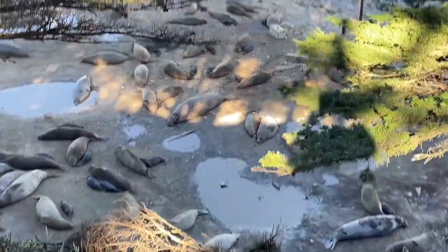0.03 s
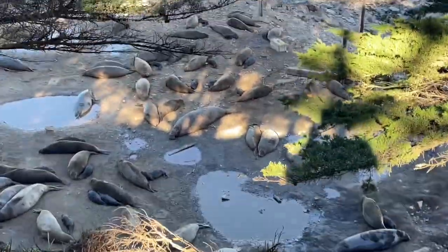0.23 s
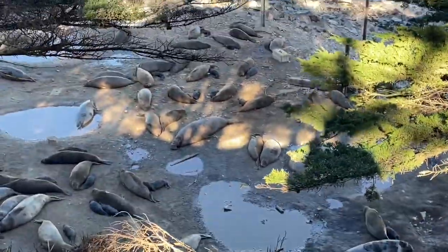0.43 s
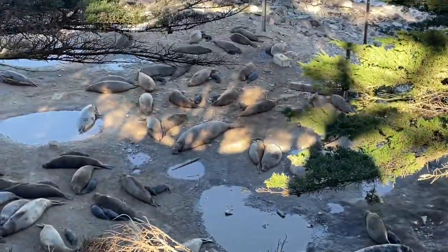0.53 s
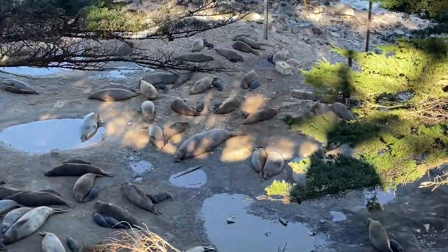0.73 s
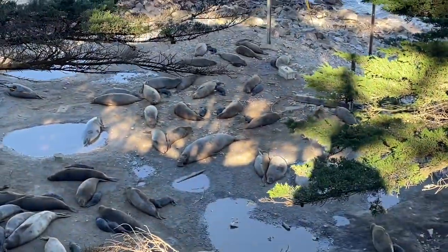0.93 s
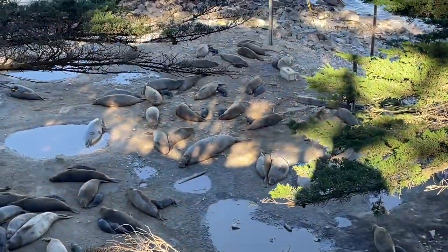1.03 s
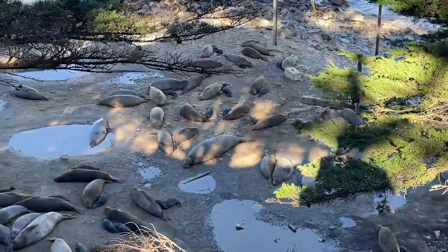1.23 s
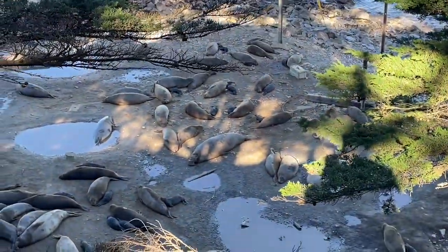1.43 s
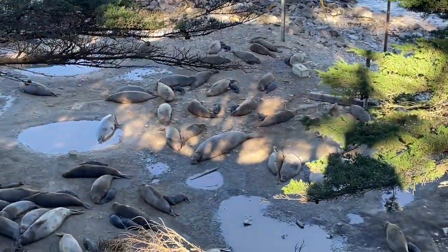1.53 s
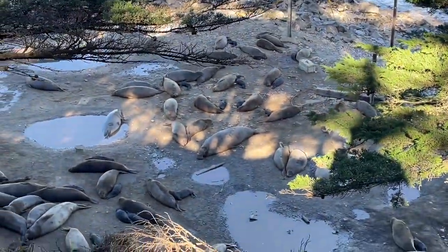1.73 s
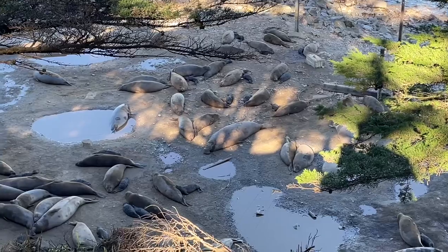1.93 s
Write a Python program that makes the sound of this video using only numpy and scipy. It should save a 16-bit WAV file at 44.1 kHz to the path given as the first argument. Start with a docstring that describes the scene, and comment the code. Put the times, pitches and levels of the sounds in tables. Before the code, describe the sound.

Young elephant seals give four high, wavering, raspy cries over faint surf.

```python
"""Faint surf and a thin rustle, then distant yelps and four high, wavering cries of young elephant seals
on a beach below the listener. Pulsing vocal folds ring the throat, and a second, slower oscillator there
makes each cry rasp. A slope, a bank and a cliff throw the voices back. Soft low bumps knock on the
hand-held microphone, and one small tick falls in the pause before the last cry."""
import sys
import numpy as np
from scipy import signal
from scipy.fft import rfft, irfft
from scipy.io import wavfile
from scipy.ndimage import uniform_filter1d

SR = 44100
rng = np.random.default_rng(int(sys.argv[2]) if len(sys.argv) > 2 else 0)


def dump_mix(stems):
    """Bounce the given channels to the path in sys.argv[1] as a 16-bit WAV at rate SR."""
    frames = np.atleast_2d(stems).T  # one column per channel
    limited = np.clip(frames, -1, 1)  # hard clip at full scale
    pcm = np.round(limited * 32767).astype(np.int16)
    wavfile.write(sys.argv[1], SR, pcm)


N = 88200
TIME = np.arange(N) / SR


def undb(db):
    """Decibels to gain."""
    return 10 ** (np.asarray(db) / 20)


def unit(x):
    """Scale to rms 1."""
    return x / np.sqrt(np.mean(x ** 2) + 1e-18)


def even(x):
    """Ride the slow level to rms 1 and keep the fast flutter."""
    return x / np.sqrt(uniform_filter1d(x ** 2, 1400) + 1e-12)


def curve(rows, column=1):
    """Automation: one column of a table, joined by straight lines in time."""
    rows = np.array(rows)
    return np.interp(TIME, rows[:, 0], rows[:, column])


def equalise(x, points):
    """Filter by an EQ curve of (frequency [Hz], gain [dB]) points."""
    hz, db = np.array(points).T
    bins_hz = np.maximum(np.fft.rfftfreq(2 * N, 1 / SR), 1)
    gain = undb(np.interp(np.log(bins_hz), np.log(hz), db))
    return irfft(rfft(x, 2 * N) * gain)[:N]


def lowpass(x, hz, order=2):
    """Low-pass without delay."""
    return signal.sosfiltfilt(signal.butter(order, hz, fs=SR, output="sos"), x, padtype="even")


def wobble(hz):
    """Smooth random modulation at rms 1, rolling off above hz."""
    rolloff = np.exp(-(np.fft.rfftfreq(N, 1 / SR) / hz) ** 2)
    return unit(irfft(rfft(rng.standard_normal(N)) * rolloff, N))


# Stereo width across the spectrum (frequency [Hz], side gain [dB])
WIDTH_EQ = [(50,-12.5),(900,-6),(2200,-8),(4000,-69),(7000,2.5)]

def spread(mid, side):
    """Mid and equalised side to left and right."""
    return mid + np.array([[1], [-1]]) * equalise(side, WIDTH_EQ)


def noise_bed(eq, flicker_db, flicker_hz):
    """Stereo coloured noise with a flickering level."""
    mid, side = (unit(equalise(rng.standard_normal(N), eq)) * undb(flicker_db * wobble(flicker_hz))
                 for _ in range(2))
    return spread(mid, side)


# Dark tone of surf and colony murk (frequency [Hz], gain [dB])
SURF_EQ = [(25,-10.5),(60,0),(190,-3),(400,-10),(680,-4),(1300,-14.5),(2200,-15.5),(3500,-23.5),(7000,-40.5),(9000,-63)]

def surf():
    """A steady distant wash that wavers a little."""
    return noise_bed(SURF_EQ, flicker_db=0.74, flicker_hz=52) * undb(-46.5)


# Bright tone of the rustle (frequency [Hz], gain [dB])
RUSTLE_EQ = [(1500,-19),(4000,0.5),(6500,-2),(9000,-20)]
# Fader ride of the rustle (time [s], level [dB])
RUSTLE_FADER = [(0,-65),(.16,-55.5),(.35,-63.5),(.61,-60.5),(.65,-57.5),(.96,-58),(1.2,-72.5)]

def rustle():
    """A thin, uneven hiss that comes and goes in the first second."""
    return noise_bed(RUSTLE_EQ, flicker_db=1.7, flicker_hz=140) * undb(curve(RUSTLE_FADER))


# Distant seals (start [s], length [s], first pitch [Hz], last pitch [Hz], level [dB])
YELPS = [(0.094,0.039,600,705,-39.5),(0.113,0.092,725,828,-44),(0.187,0.082,699.6,533,-40.5)]

def far_yelps():
    """Short, jittery glides from further along the beach: a fundamental and a softer octave."""
    out = 0
    for start, length, first_hz, last_hz, db in YELPS:
        progress = np.clip((TIME - start) / length, 0, 1)
        hz = (first_hz + (last_hz - first_hz) * progress) * (1 + 0.027 * wobble(170))
        phase = 2 * np.pi * np.cumsum(hz) / SR
        tone = np.sin(phase) + undb(-4) * np.sin(2 * phase)
        out = out + undb(db) * np.sin(np.pi * progress) * tone
    return out


# Knocks on the microphone (time [s], relative level [dB])
BUMP_HITS = [(0.184,-38.5),(0.269,-29.5),(1.057,-24.5),(1.167,-34),(1.195,-32),(1.232,-29),(1.25,-32.5),(1.313,-28),(1.472,-30.5),(1.583,-25),(1.707,-31)]

def bumps():
    """Soft knocks on the microphone that drop in pitch as they die, each stirring up a short rumble."""
    rest_hz, ring_cycles = 64.9, 1.85
    attack_s, sag_s, rumble_s = 0.0015, 0.0076, 0.037
    knocks, rumble_level = 0, 0
    for start, db in BUMP_HITS:
        age = np.maximum(TIME - start, 0)
        push = undb(db) * (1 - np.exp(-age / attack_s))
        cycles = rest_hz * (age + 2.23 * sag_s * (1 - np.exp(-age / sag_s)))
        knocks = knocks - push * np.sin(2 * np.pi * cycles) * np.exp(-age * rest_hz / ring_cycles)
        rumble_level = rumble_level + push * np.exp(-age / rumble_s)
    noise = lowpass(rng.standard_normal(N), hz=200)
    rumble = unit(noise - lowpass(noise, hz=45.5))
    return .5 * knocks + undb(-7) * rumble_level * rumble


def vocal_folds(hz, folds_per_beat, rasp, hoarse):
    """Fold pulses and puffs of breath, pushed about by a slower oscillator loosely locked to the folds."""
    jitter, drift, rasp_swing = .025, .1, .7
    fold_phase = 2 * np.pi * np.cumsum(hz * (1 + jitter * hoarse * wobble(344))) / SR
    drift_hz = hz / folds_per_beat * drift * hoarse * wobble(87.6)
    rasp_phase = fold_phase / folds_per_beat + 2 * np.pi * np.cumsum(drift_hz) / SR
    phase = fold_phase + rasp_swing * rasp * np.sin(rasp_phase)
    smear = .55 * np.sqrt(hoarse)  # upper partials stray from the beat
    pulses = sum(np.cos(k * phase + k * k + smear * (k - 1) * wobble(160)) for k in range(1, 13))
    tremolo = (1 + rasp * np.cos(rasp_phase)) / np.sqrt(1 + rasp ** 2 / 2)
    breakup = (1 + .5 * hoarse * wobble(110)) * undb(2 * hoarse * wobble(55))
    breath = rng.standard_normal(N) * (1 + 2 * np.cos(phase))
    hiss = breath - lowpass(breath, hz=2620, order=4)
    return unit(pulses * tremolo * breakup) + .55 * hoarse * breath + 0.93 * hiss


# Formants of throat and mouth (frequency [Hz], gain [dB])
THROAT_EQ = [(200,-29),(420,-18),(560,-1),(700,3.5),(870,-2),(1050,-3.5),(1450,3),(1620,4.5),(1780,-4.5),(2080,-1),(2450,-7),(2820,-11),(3400,-28.5),(6800,-40),(9000,-52)]
# What a gaping mouth adds (frequency [Hz], gain [dB])
GAPE_EQ = [(400,17.5),(650,0.5),(870,11),(1150,-3),(1420,0.5),(2700,3),(4700,10.5)]
# Vowel movement: the first overtones against the higher ones (time [s], gain [dB])
VOWEL = [(.31,-10),(.47,3.5),(.65,-8.5),(.96,4.5),(1.5,7.5),(1.63,-8),(1.68,7.5)]

def throat(source, gape):
    """Throat and mouth resonate; returns the fundamental and overtone bands, each levelled."""
    voiced = equalise(source, THROAT_EQ)
    voiced = (1 - gape) * voiced + gape * equalise(voiced, GAPE_EQ)
    fundamental = lowpass(voiced, hz=948, order=6)
    overtones = voiced - fundamental
    overtones = overtones + (undb(curve(VOWEL)) - 1) * lowpass(overtones, hz=1620, order=6)
    return even(fundamental), even(overtones)


# Automation of the near voices, one list per cry
# (time [s], pitch [Hz], fundamental before trim [dB], overtones before trim [dB], rasp [0-1])
CRY_SHAPES = [
    [(.222,669,-25.5,-35,0.39),(.25,615.7,-25,-41.5,0.26),(.275,693.3,-22.5,-36.5,0.87),(.32,653.5,-25.5,-39,0.1),(.365,700,-23,-37.5,0.4),(.41,703.4,-27,-31,0.31),(.44,686.8,-21.5,-38,0.09),(.462,581,-31,-39,0.06),(.492,564.8,-24.5,-33,0),(.512,626,-31,-36.5,0.5),(.538,592.6,-30.5,-38.5,0.21),(.588,580.4,-39,-45,1)],
    [(.608,562.7,-39.5,-49.5,0.32),(.645,632.9,-27.5,-43.5,0.32),(.685,693.6,-22.5,-38.5,0),(.715,693.7,-22.5,-32.5,0.44),(.745,587.6,-27.5,-45,0.54),(.765,522.3,-37.5,-40,0)],
    [(.89,602,-29.5,-17.5,0.9),(.91,652.7,-29.5,-51.5,0.22),(.928,705.5,-22,-43,0.08),(.968,722.4,-34.5,-33,0.1),(.985,672,-21,-41,0.33),(.993,596,-28.5,-52.5,0)],
    [(1.456,696.5,-29,-25.5,.6),(1.482,699,-28.5,-33,.5),(1.505,721,-32.5,-29.5,0.21),(1.53,676.2,-31,-34.5,.9),(1.555,614.6,-30.5,-39.5,0.46),(1.585,616.3,-43.5,-43.5,0),(1.645,661,-26,-42.5,0.3),(1.667,699,-28,-34,0.21),(1.69,649,-27,-35.5,0.17),(1.72,563,-38,-43,0.26)],
]
# Mouth opening, one value per cry (gape [0-1])
CRY_GAPES = [0, 0, 0, 1]
# Grain of the rasp (time [s], fold cycles per rasp beat [ratio], hoarseness per unit of rasp [ratio])
RASP_GRAIN = [(.28,5,1.3),(.32,3,1.1),(.43,3,.9),(.52,4,1.7),(1.47,5,1),(1.505,5,.6),(1.545,3,.45),(1.64,3,.3),(1.675,3,1.5)]

def near_cries():
    """Four seal cries: the pitch arches, and the voice turns hoarse where it rasps."""
    fade_s, low_trim_db, high_trim_db = 0.019, 1, -0.5
    out = 0
    for cry, gape in zip(CRY_SHAPES, CRY_GAPES):
        hz, low_db, high_db, rasp = (curve(cry, column) for column in range(1, 5))
        hoarse = rasp * curve(RASP_GRAIN, column=2)
        fundamental, overtones = throat(vocal_folds(hz, curve(RASP_GRAIN), rasp, hoarse), gape)
        voice = fundamental * undb(low_db + low_trim_db) + overtones * undb(high_db + high_trim_db)
        start, end = cry[0][0], cry[-1][0]
        gate = np.clip((TIME - start) / fade_s, 0, 1) * np.clip(1 + (end - TIME) / fade_s, 0, 1)
        out = out + gate * voice
    return out


def slope_echo(voices, shifted):
    """One clear, wide slap off the slope that beats against the gliding pitch."""
    delay_s = 0.034
    mid, side = (np.interp(TIME - delay_s, TIME, x) for x in (voices, shifted))
    return undb(-14.5) * spread(mid, undb(9) * side)


def scattered_echo(x, t60_s, delay_s):
    """Many small reflections that die away in a stereo tail."""
    age = TIME - delay_s
    decay = (age > 0) * np.exp(-np.log(1000) * np.abs(age) / t60_s)
    tails = (unit(rng.standard_normal(N) * decay) / np.sqrt(N) for _ in range(2))
    mid, side = (signal.fftconvolve(x, tail)[:N] for tail in tails)
    return spread(mid, side)


def tick():
    """One faint, bright tick in the pause, cut from noise with the rustle's tone."""
    start_s, decay_s = 1.225, 0.016
    age = TIME - start_s
    noise = lowpass(unit(equalise(rng.standard_normal(N), RUSTLE_EQ)), hz=7100, order=6)
    band = noise - lowpass(noise, hz=4760)
    return undb(-51) * band * (age > 0) * np.exp(-np.abs(age) / decay_s)


def scene():
    """The mix: surf and rustle under the seals and their echoes, with bumps and a tick in the centre."""
    voices = near_cries() + far_yelps()
    shifted = signal.hilbert(voices).imag  # a quarter cycle off, so left and right differ in phase
    direct = spread(voices, undb(-5.5) * shifted)
    slope = slope_echo(voices, shifted)
    bank = undb(-11) * scattered_echo(lowpass(voices, hz=3230, order=1), t60_s=0.47, delay_s=0.042)
    cliff = undb(-22.5) * scattered_echo(lowpass(voices, hz=1000), t60_s=.6, delay_s=.15)
    return surf() + rustle() + direct + slope + bank + cliff + bumps() + tick()


def record(dry):
    """A steep high cut at 13.7 kHz on the whole mix."""
    return signal.sosfilt(signal.ellip(8, .2, 70, 13700, fs=SR, output="sos"), dry)


dry = scene()
out = record(dry)
dump_mix(out)
```